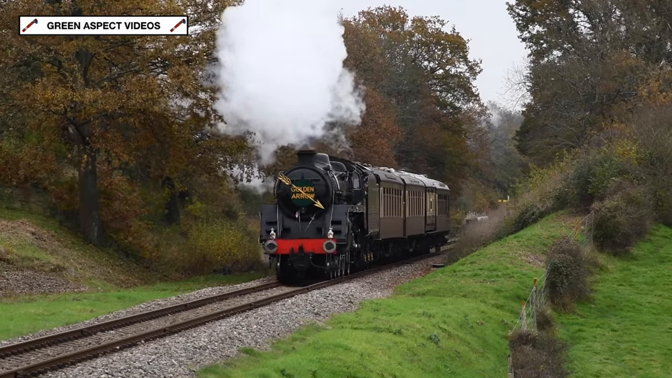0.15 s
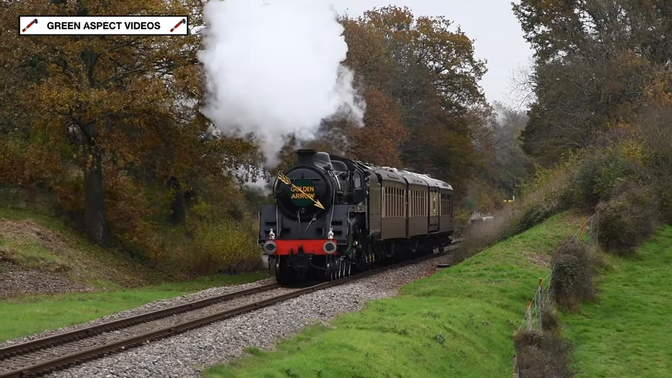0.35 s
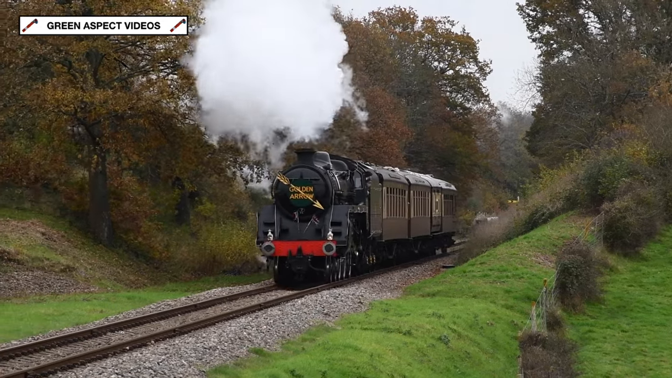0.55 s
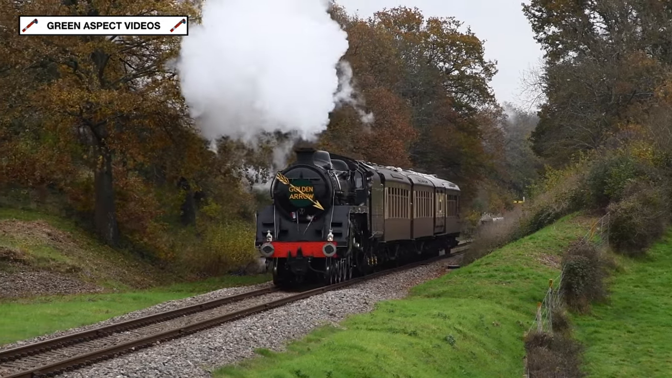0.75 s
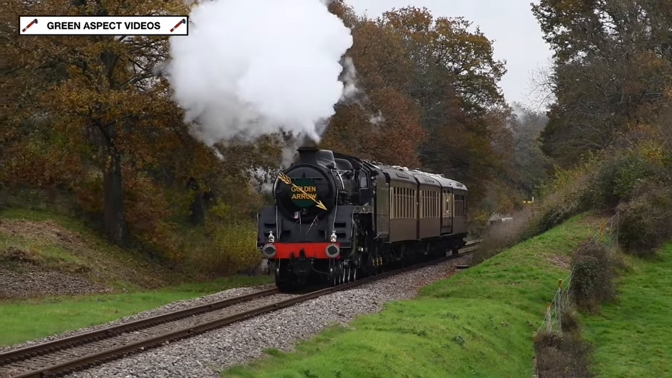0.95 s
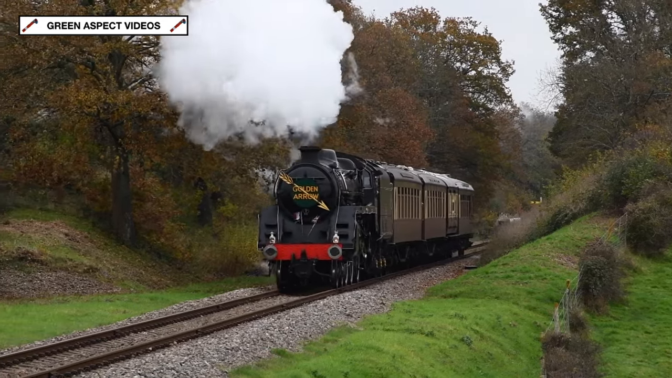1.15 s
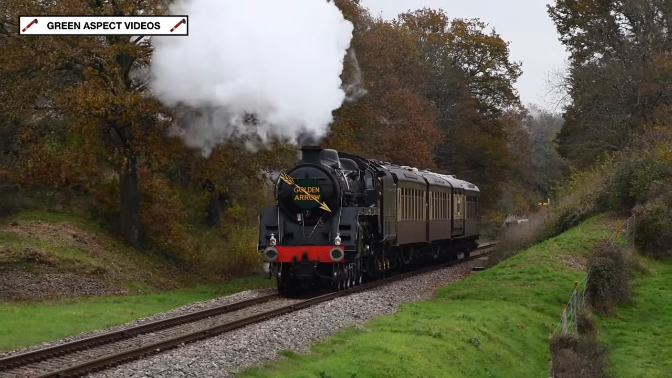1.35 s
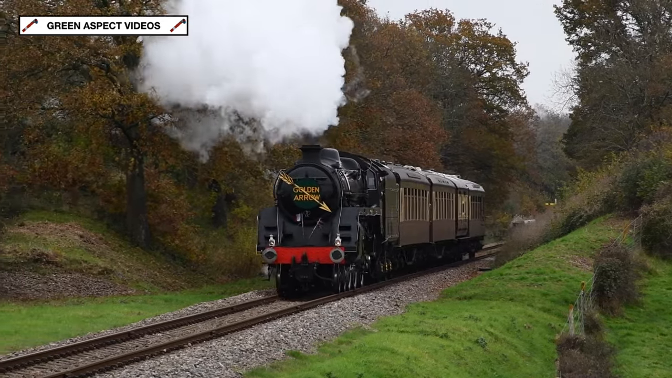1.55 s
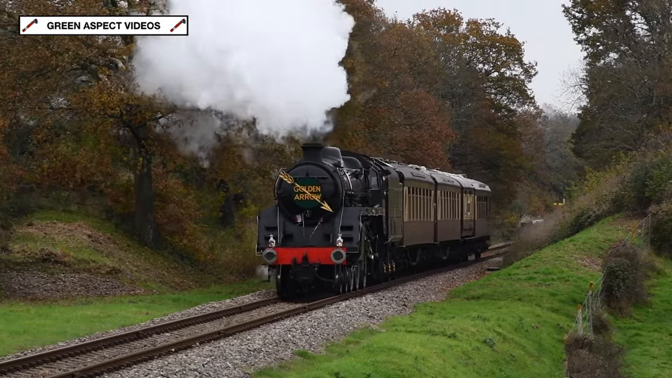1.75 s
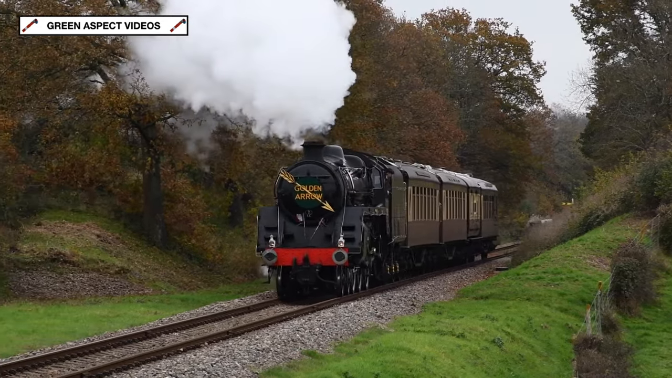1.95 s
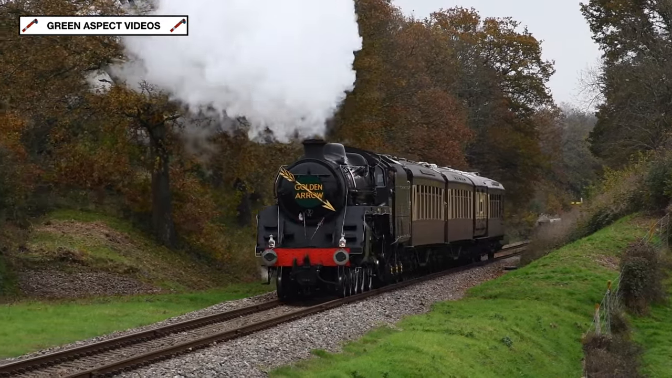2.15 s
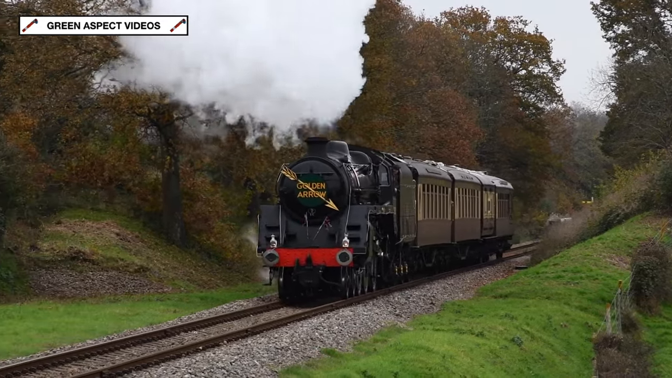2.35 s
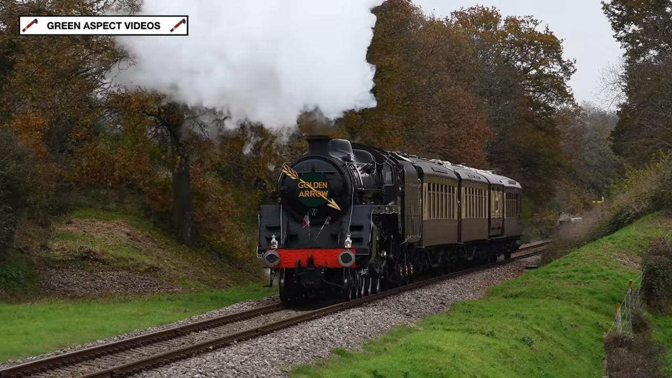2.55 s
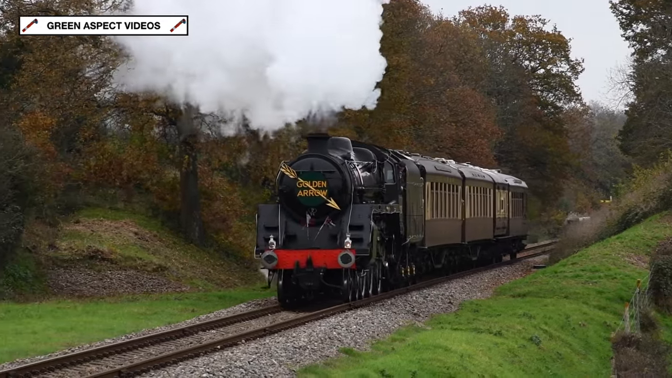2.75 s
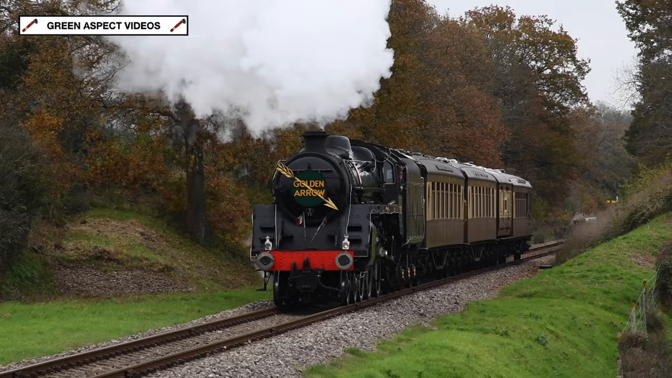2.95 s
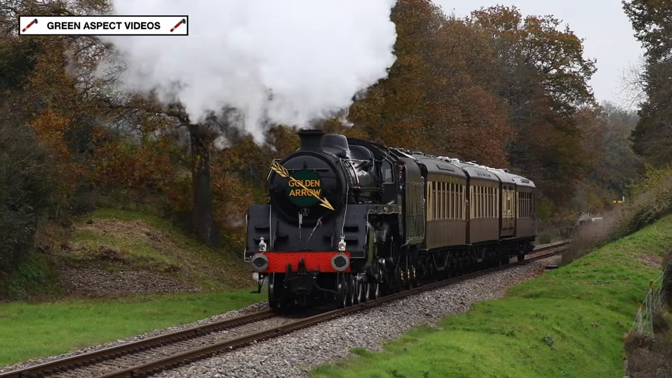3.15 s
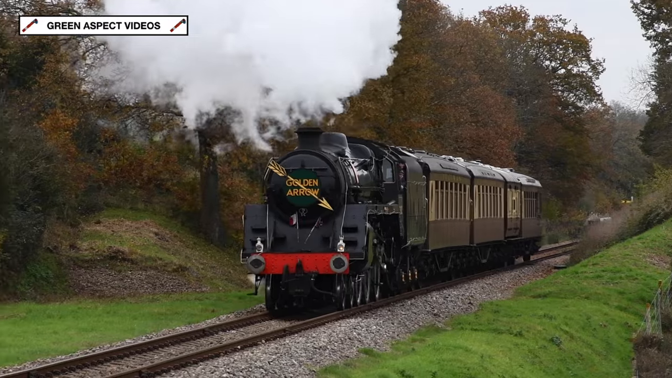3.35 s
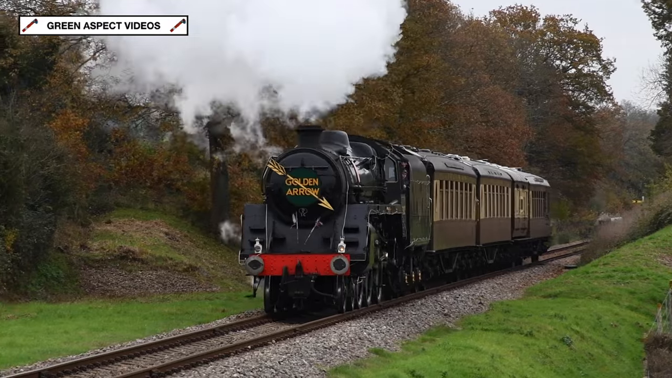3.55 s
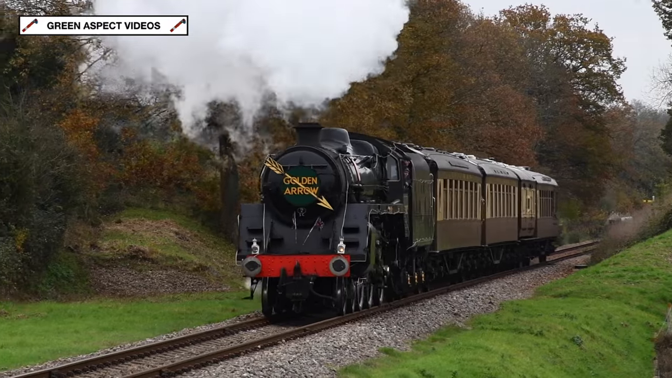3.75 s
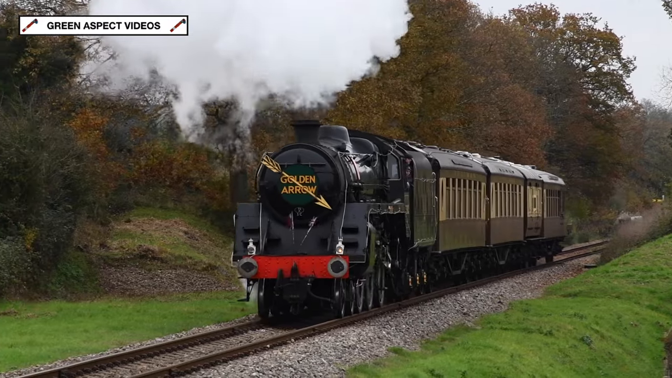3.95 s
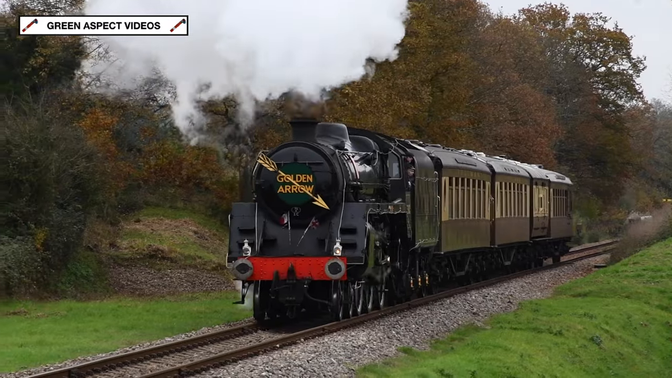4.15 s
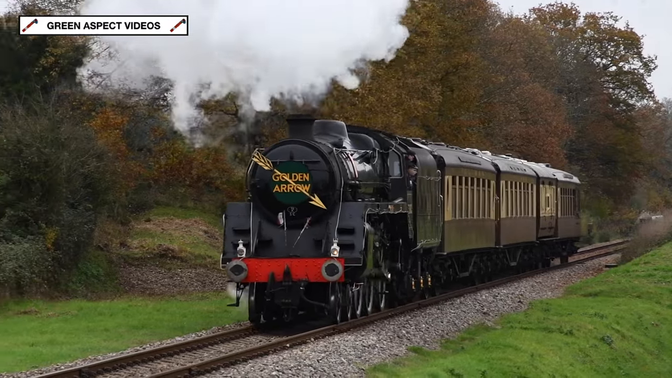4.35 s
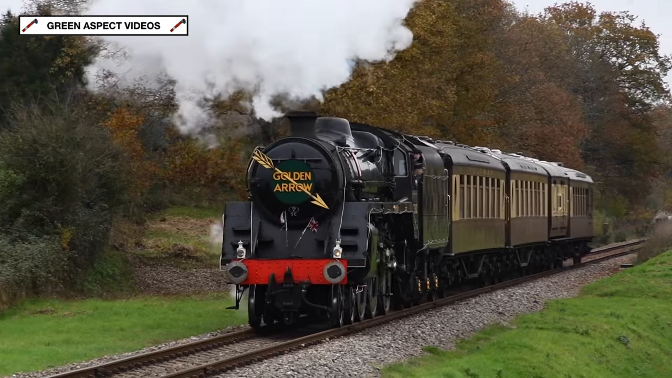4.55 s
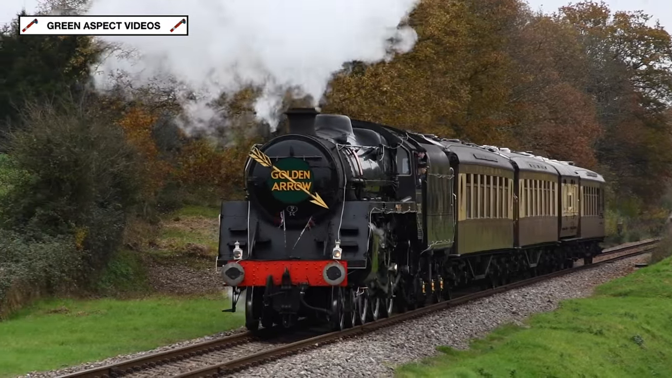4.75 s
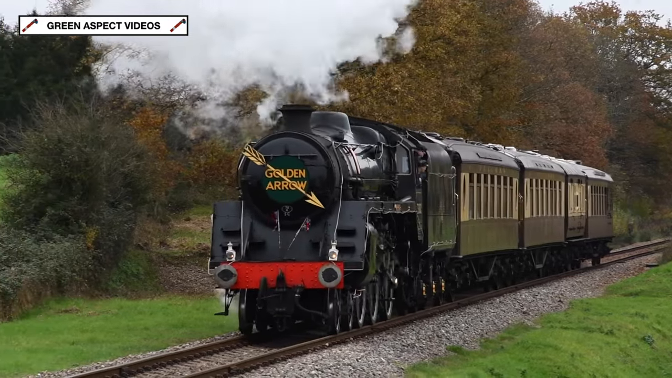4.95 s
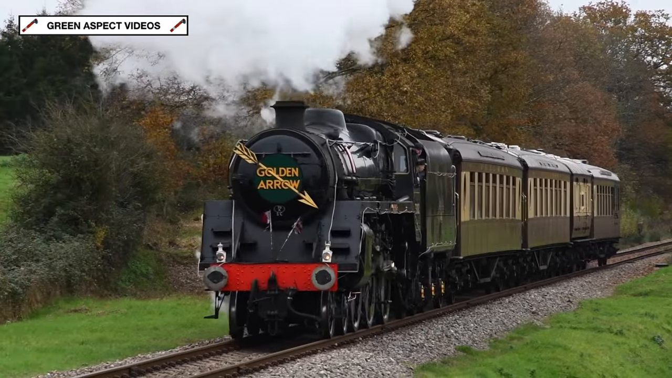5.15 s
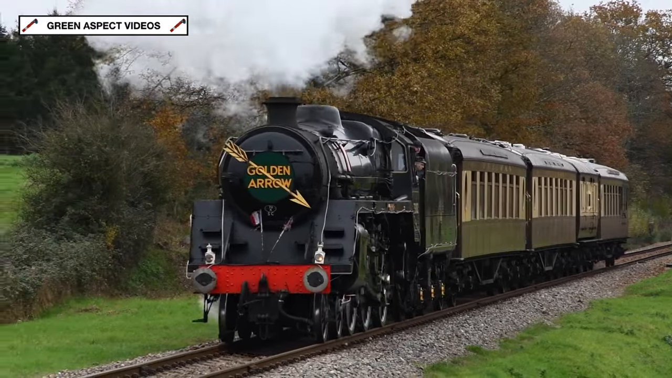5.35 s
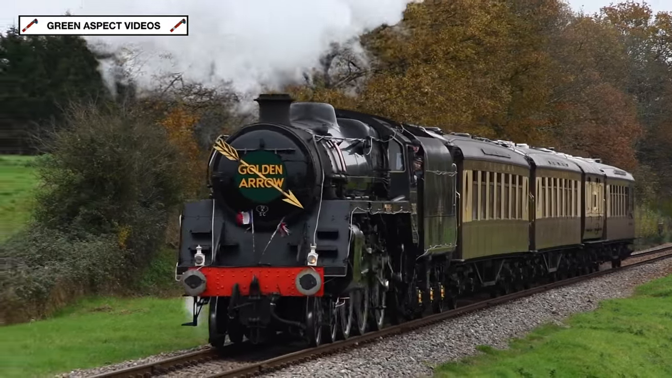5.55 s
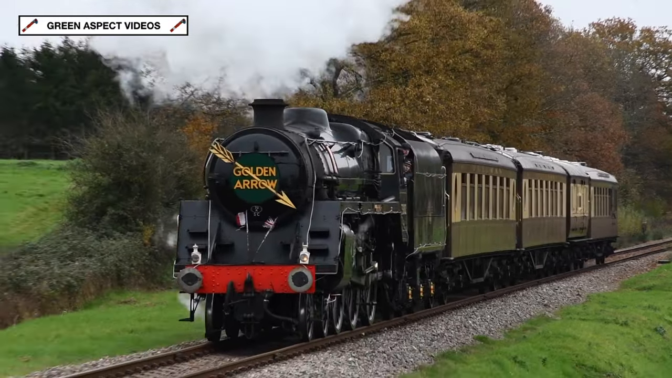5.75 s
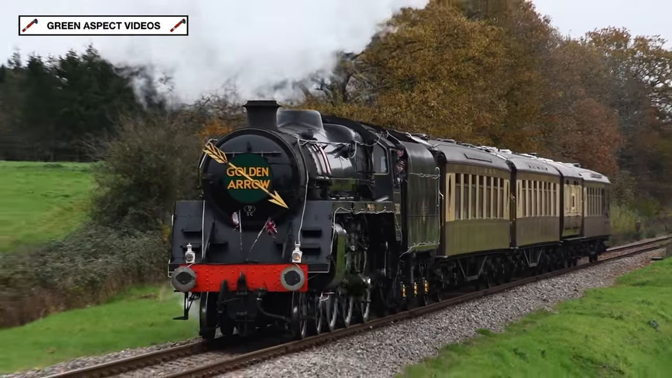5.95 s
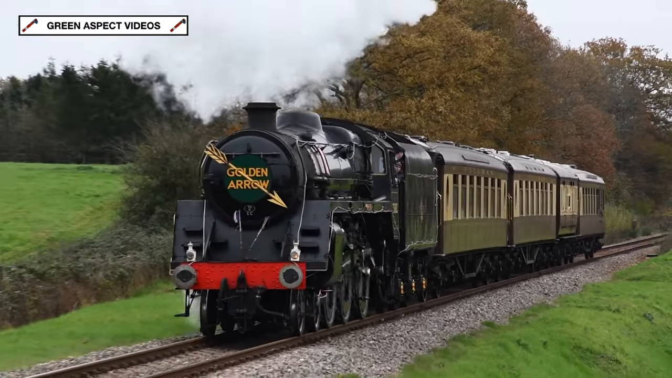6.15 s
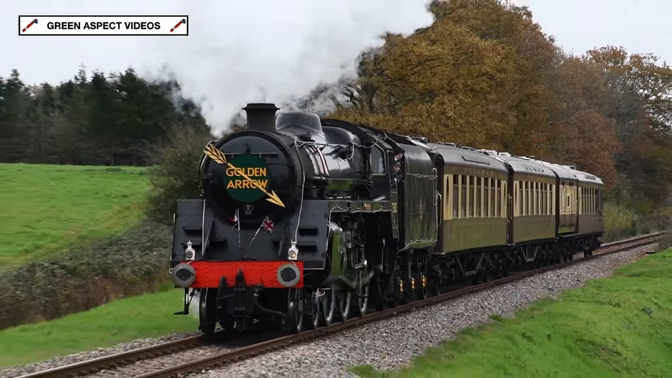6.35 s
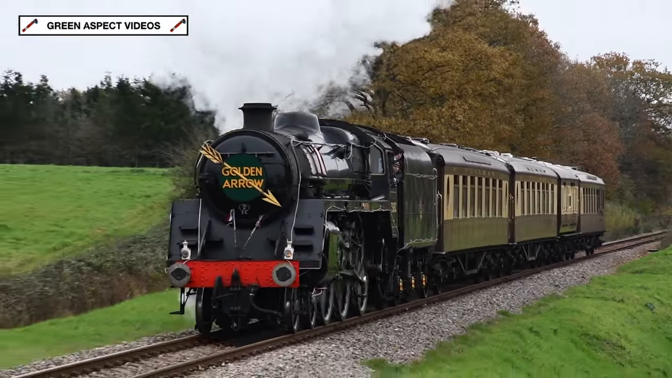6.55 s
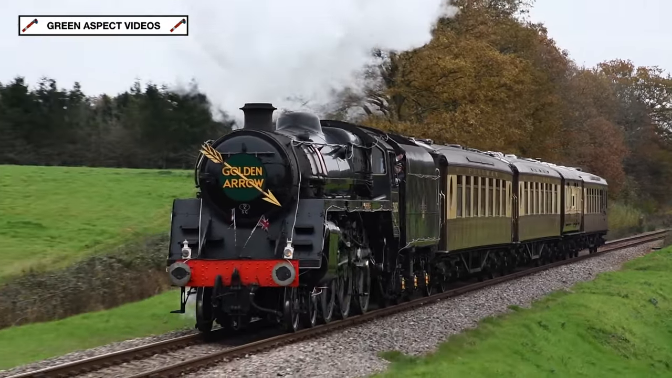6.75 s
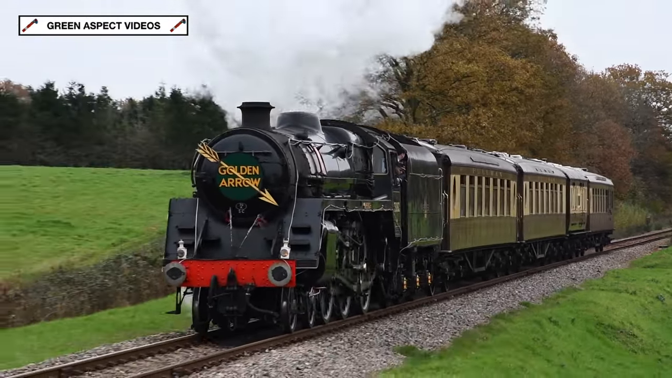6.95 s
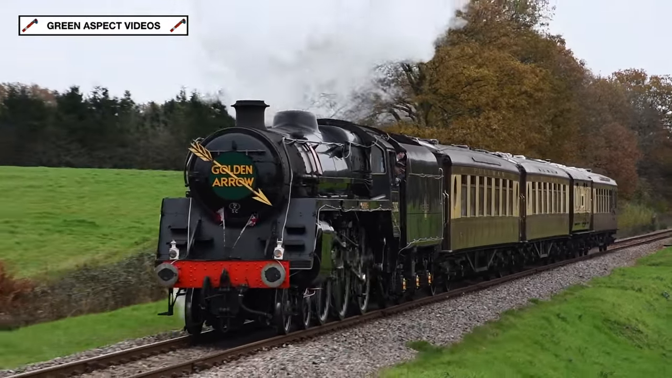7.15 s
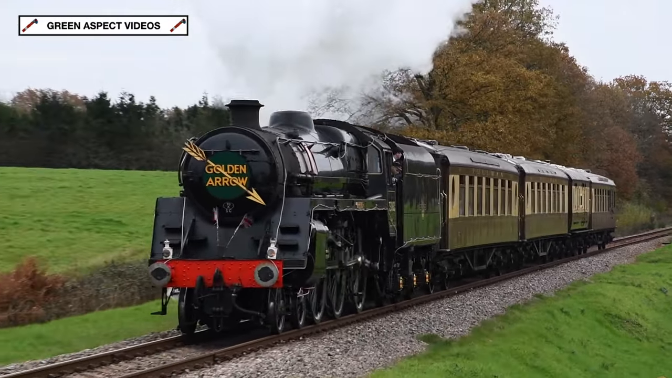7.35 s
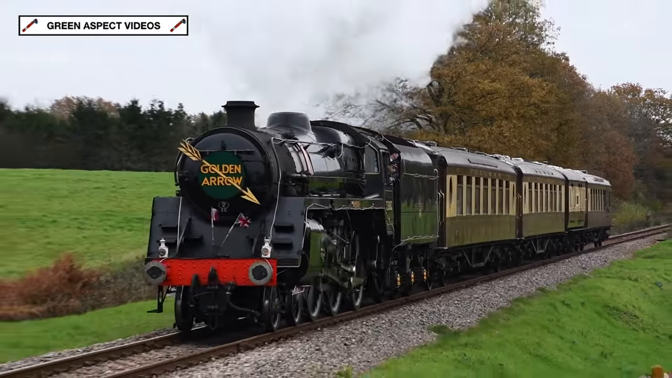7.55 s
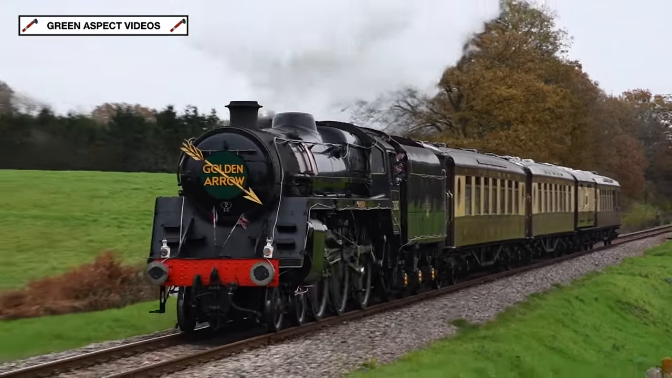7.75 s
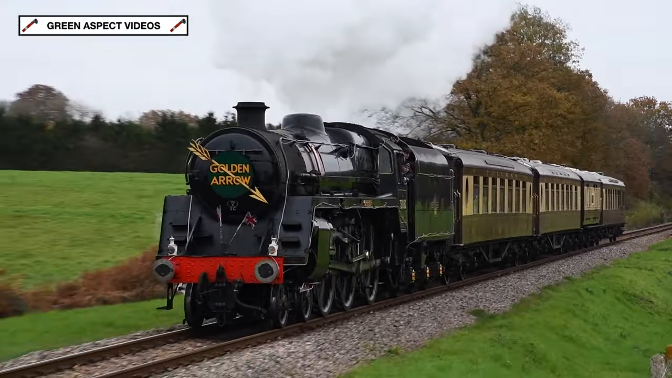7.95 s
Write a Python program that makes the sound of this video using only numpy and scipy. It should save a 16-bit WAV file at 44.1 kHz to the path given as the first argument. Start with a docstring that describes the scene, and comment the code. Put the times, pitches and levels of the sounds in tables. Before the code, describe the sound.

A steam locomotive climbs steadily towards the listener, rapid even chuffs barking from its chimney, growing louder over low wheel rumble and leaking steam hiss.

```python
"""Beside a railway line, with trees and banks around: a two-cylinder steam engine climbs towards the listener.
Four exhaust beats sound in each turn of the wheels. Each is a low thump plus a burst of shaped noise (the jet
of steam), coloured by the chimney and the bounce off the ground; the trees add a dull tail.
The wheels and coaches rumble and leaking steam hisses, both as noise that grows fuller as the train nears.
A thin, wavering tone is the leak singing at its edge."""
import sys
import numpy as np
from scipy import signal
from scipy.fft import rfft, irfft, next_fast_len
from scipy.io import wavfile
from scipy.ndimage import uniform_filter1d

SR = 44100
rng = np.random.default_rng(int(sys.argv[2]) if len(sys.argv) > 2 else 0)


def persist_wave(psi):
    """Save psi, clipped to +-1, as 16-bit WAV."""
    counts = np.round(np.clip(psi, -1, 1) * 32767).astype(np.int16)
    wavfile.write(sys.argv[1], SR, np.atleast_2d(counts).T)


N = 356769
TIME = np.arange(N) / SR  # seconds
SIZE = 16384  # samples in one exhaust beat
BEAT_HZ = np.arange(SIZE // 2 + 1) * SR / SIZE  # the frequencies in its spectrum


def undb(db):
    """Turn decibels into gain."""
    return 10 ** (np.asarray(db) / 20)


def at(s, table):
    """Read a table of time and value at time s, with straight lines between its rows."""
    return np.interp(s, *np.transpose(table))


def on_log(hz, points_hz, values):
    """Draw straight lines between points, with pitch on a logarithmic axis as the ear hears it."""
    return np.interp(np.log(np.maximum(hz, 1)), np.log(points_hz), values)


def causal(db):
    """Build a filter with this gain that rings only after it is struck (minimum phase)."""
    cepstrum = irfft(db * np.log(10) / 20)
    # fold the half before the strike onto the half after it
    cepstrum[1:SIZE // 2] *= 2
    cepstrum[SIZE // 2 + 1:] = 0
    return np.exp(rfft(cepstrum))


def walk(rate, n):
    """Wander smoothly at random, `rate` new values a second, with a spread near 1."""
    hold = max(int(SR / rate), 1)  # samples
    steps = np.repeat(rng.standard_normal(n // hold + 1), hold)
    return np.sqrt(3 / 2) * uniform_filter1d(steps, hold)[:n]


def noise(points_hz, db):
    """Make steady noise with the given spectrum by weighting the frequencies of white noise."""
    n = next_fast_len(N)
    hz = np.arange(n // 2 + 1) * SR / n
    gain = undb(on_log(hz, points_hz, db))
    return irfft(rfft(rng.standard_normal(n)) * gain, n)[:N]


def add(track, start_s, sound):
    """Mix a sound into the track, cutting what runs past its end."""
    i = max(int(start_s * SR), 0)
    track[i:i + len(sound)] += sound[:N - i]


START_M, SPEED_M_S = 113.4, 10.3


def distance(s):
    """Metres from chimney to listener, shrinking at a constant speed."""
    return START_M - SPEED_M_S * s


def nearness(near_m):
    """0 at the start and 1 at near_m; every halving of the distance adds the same."""
    return np.log(START_M / distance(TIME)) / np.log(START_M / near_m)


# one turn of the driving wheels, and the share by which the gradient delays beats for each second gone by
TURN_S, SLOWING_PER_S = .52684, .00057
# the four beats of a turn, uneven as the valves are set:
# (t/s into the turn, level/dB, bass level/dB, treble level/dB, length as a share of the usual)
VALVE_BEATS = [(.0746, -0.67, -1.25, -1.7, 1), (.2106, 0, -1.5, -1.5, 1), (.3344, -0.96, -1.05, -2.8, 1),
               (.4643, -0.85, -2.3, -2.8, .87)]
# beats that bark harder or softer than their valve's usual: (t/s, extra level/dB, extra treble level/dB)
BEAT_ACCENTS = [(.33, -2, 2), (.74, 1, 2.5), (1.26, 0, 1), (1.52, -0.5, 2), (3.63, -0.6, 1.5),
                (3.77, 0.5, -2), (4.16, 0.5, -10), (4.44, 0.3, -0.5), (4.97, 0.5, 2), (5.5, 0.9, 1),
                (6.03, 0.4, 1), (6.27, -1, 1.5), (7.48, -0.5, 2), (7.62, 0, 2.5)]


def strokes(level_db=0.28, bass_db=1.0, treble_db=0.15, stretch=0.041):
    """Time every beat from the turning wheels, in rows like VALVE_BEATS, with small random differences."""
    turns = int(N / SR / TURN_S) + 1
    rows = np.tile(VALVE_BEATS, (turns, 1))
    steady_s = rows[:, 0] + TURN_S * np.repeat(np.arange(turns), len(VALVE_BEATS))
    slowed_s = steady_s * (1 + SLOWING_PER_S * steady_s)
    chance = rng.standard_normal((len(rows), 4)) * [level_db, bass_db, treble_db, stretch]
    rows = np.column_stack([slowed_s, rows[:, 1:] + chance])
    for s, extra_db, extra_treble_db in BEAT_ACCENTS:
        nearest = np.argmin(abs(rows[:, 0] - s))
        rows[nearest] += [0, extra_db, 0, extra_treble_db, 0]
    return rows[rows[:, 0] < N / SR]


# how one beat swells and dies in three registers:
# (t/ms after the valve opens, level/dB at 250 Hz, level/dB at 1.5 kHz, level/dB at 5 kHz)
PUFF_SHAPE = [(-9, -38, -38, -42), (-2.5, -4, -14.5, -7.5), (2.5, -12, -4, 1.5), (6.5, -5.5, -3.5, 2.5),
              (20, 2, 1.5, 1.5), (32.5, 0.5, -3.5, 2), (44, -1.5, -5.5, -6.5), (67.5, -9.5, -16, -12.5),
              (97.5, -18.5, -24.5, -21), (163, -48, -50, -48)]


def jet(ms, front, repeat=0.33, repeat_hz=1000, eddy_db=1.0, eddy_rate=400):
    """Spectrum of one burst: each register swells and dies at its own pace, and eddies shake the turbulence."""
    puff_ms, *shapes = np.transpose(PUFF_SHAPE)
    # the pressure front rings alike from one beat to the next; the finer turbulence is always new
    same = repeat / (1 + (BEAT_HZ / repeat_hz) ** 2)
    eddies = undb(eddy_db * walk(eddy_rate, SIZE))
    turbulence = rfft(rng.standard_normal(SIZE) * eddies)
    flow = irfft(np.sqrt(same) * front + np.sqrt(1 - same) * turbulence)
    burst = 0
    for shape, register in zip(shapes, np.eye(3)):
        swell = undb(np.interp(ms, puff_ms, shape, left=-200, right=-200))
        burst = burst + rfft(flow * swell) * on_log(BEAT_HZ, [250, 1500, 5000], register)
    return burst


def thump(ms, centre_ms=10, width_ms=3, echo_ms=28, echo_db=-10):
    """The slug of steam leaving the chimney: one push-pull-push of pressure, and its echo from the bank."""
    def push_pull_push(x):
        return (x ** 2 - 1) * np.exp(-x ** 2 / 2)

    direct = push_pull_push((ms - centre_ms) / width_ms)
    echo = push_pull_push((ms - centre_ms - echo_ms) / width_ms)
    return direct + undb(echo_db) * echo


def own_colour(hz):
    """Shallow random humps and hollows in dB that make each beat bark a little differently."""
    points_hz, spread_db = np.geomspace(600, 12000, 36), 1.5
    humps_db = spread_db * rng.standard_normal(len(points_hz) - 2)
    return on_log(hz, points_hz, np.pad(humps_db, 1))  # flat at both ends


# pitch of the first dip above zero that the bounce off the ground makes: (t/s, f/Hz)
GROUND_DIP = [(0, 3300), (1, 2740), (2, 2307), (3, 1960), (4, 1770), (5, 1617), (6, 1293), (8.1, 780)]


def ground(hz, s, far_bounce=0.46, near_bounce=0.21, damp_hz=7500):
    """Gain in dB of direct sound plus a late, inverted bounce, which weakens as the chimney nears."""
    dip_hz = at(s, GROUND_DIP)
    bounce = near_bounce + (far_bounce - near_bounce) * distance(s) / START_M
    # the bounce is dull, and comes 1 / dip_hz seconds after the direct sound
    return 20 * np.log10(abs(1 - bounce * np.exp(-(hz / damp_hz) ** 2 - 2j * np.pi * hz / dip_hz)))


# the jet has its plain level at this distance, and its beats grow longer by this share of the usual
BLAST_M, LENGTH_PER_S = 50, 0.029
# basic colour of the jet: (f/Hz, relative level/dB)
BLAST_COLOUR = [(35, -38), (77, -6.5), (138, -8.5), (218, -5), (465, -8.5), (924, -8.5), (1275, -10.5),
                (1916, -13), (2500, -16), (3030, -20), (4170, -22), (5230, -33.7), (7270, -37.5),
                (14600, -60)]
# smokebox and chimney resonances: (f/Hz, width/Hz, lift/dB)
CHIMNEY_RINGS = [(173.2, 30.6, 7.5), (194.4, 35, 3.5), (232.2, 25, 6), (317, 31, 4), (376, 88, 3.5),
                 (408.5, 24, 4.5), (520.5, 26, 3), (554, 105, 2.5), (642, 72, 2.5), (759.5, 18.5, 5.5),
                 (924, 56, 5), (1108, 220, 3), (1366, 73, 4.5), (1680, 255, 4.5), (2437, 280, 3.5)]
# level of the jet, apart from distance: (t/s, level/dB)
JET_LEVEL = [(0, -0.5), (1.5, -1.5), (3, 0.96), (5.3, 0.36), (6.1, -1.15), (7.1, -1), (8.1, -3.5)]
# level of the jet's bass: (t/s, level/dB)
JET_BASS = [(0, 0.2), (2, 0.5), (4.3, .3), (5.3, 2), (6.2, 4.5), (7, 1.3), (8.1, 3.5)]
# level of the jet's treble: (t/s, level/dB)
JET_TREBLE = [(0, 0.5), (1.3, -4), (2.5, -4.5), (4.2, -9), (5.3, -5), (6.3, 3), (8.1, 2)]


def exhaust(jet_db=2.5, thump_db=-29.0, thump_growth_db_per_s=0.95, renew=0.25):
    """Every beat is a jet coloured by chimney and ground, louder with nearness, on top of its thump."""
    lead_s = .03  # room for the sound before the valve time
    ms = (np.arange(SIZE) / SR - lead_s) * 1000
    blast_db = on_log(BEAT_HZ, *np.transpose(BLAST_COLOUR))
    rings_db = sum(db / (1 + ((BEAT_HZ - centre) / (width / 2)) ** 2) for centre, width, db in CHIMNEY_RINGS)
    front = rfft(rng.standard_normal(SIZE))
    out = np.zeros(N)
    for s, db, bass_db, treble_db, length in strokes():
        # the paths to the listener shift a little as the engine moves on
        front = np.sqrt(1 - renew) * front + np.sqrt(renew) * rfft(rng.standard_normal(SIZE))
        shelves_db = [bass_db + at(s, JET_BASS), 0, 0, treble_db + at(s, JET_TREBLE)]
        colour_db = blast_db + on_log(BEAT_HZ, [450, 1000, 3000, 7000], shelves_db)
        colour_db = colour_db + own_colour(BEAT_HZ) + rings_db + ground(BEAT_HZ, s)
        stretched_ms = ms / (length + LENGTH_PER_S * s)
        burst = irfft(jet(stretched_ms, front) * causal(colour_db))
        jet_gain = undb(jet_db + at(s, JET_LEVEL)) * BLAST_M / distance(s)
        thump_gain = undb(thump_db + thump_growth_db_per_s * s)
        add(out, s - lead_s, undb(db) * (jet_gain * burst + thump_gain * thump(ms)))
    return out


def trees(x, t60_s=1.0, buildup_s=0.018, wet_db=-17, damp_hz=1900):
    """Trunks and banks scatter the sound into a dull tail: fading noise that smears every beat."""
    age = TIME[:SR]
    fade = np.exp(-np.log(1000) * age / t60_s)  # down 60 dB after t60_s
    tail = rng.standard_normal(SR) * fade * np.minimum(age / buildup_s, 1) ** 2
    dull = signal.butter(2, damp_hz, fs=SR, output="sos")
    tail = signal.sosfilt(dull, tail / np.linalg.norm(tail))
    return signal.fftconvolve(x, tail)[:N] * undb(wet_db)


def approaching(spectra, near):
    """Noise that gets louder while its far colour gives way to its near colour."""
    hz, far_db, near_db = np.transpose(spectra)
    rise_db = np.median(near_db - far_db)
    share = np.clip(near, 0, 1)
    far = np.sqrt(1 - share) * noise(hz, far_db)
    close = np.sqrt(share) * noise(hz, near_db - rise_db)
    return (far + close) * undb(rise_db * near)


# wheels and coaches: (f/Hz, far level/dB, near level/dB)
WHEEL_COLOUR = [(26, -66, -62), (44, -41, -25), (69.5, -17, -12), (120, -16.5, -5.5), (196, -29, -10),
                (490, -30.5, -19), (980, -25.5, -22.5), (1860, -36.5, -25.5), (5000, -63, -59)]
# level of the wheels' rumble, apart from distance: (t/s, level/dB)
WHEEL_LEVEL = [(0, 0.5), (2.3, -1.5), (3.4, -1.7), (5.5, -2), (6.2, -1.5), (7, -3), (8.1, -2)]


def rolling_wheels(near_m=43.8, jolt_db=2.0):
    """Wheels and coaches rumble as mostly low noise, jolted unevenly in level."""
    level_db = at(TIME, WHEEL_LEVEL) + jolt_db * walk(16, N)
    return approaching(WHEEL_COLOUR, nearness(near_m)) * undb(level_db)


# leaking steam: (f/Hz, far level/dB, near level/dB), before the leak's overall level
LEAK_COLOUR = [(1000, -57, -53), (2530, -45.5, -26), (3300, -40, -28.5), (4000, -46.5, -28.5),
               (4430, -43.5, -30.5), (5670, -55, -40), (5870, -49.5, -36), (7200, -67, -41),
               (10100, -74, -50.5), (15000, -82, -70)]


def steam_leak(near_m=28, level_db=1.0, flutter_db=2.0):
    """Steam escaping through a leak hisses as high noise that flutters in level."""
    return approaching(LEAK_COLOUR, nearness(near_m)) * undb(level_db + flutter_db * walk(29, N))


# how strongly the leak sings: (t/s, level/dB)
SINGING_LEVEL = [(0, -55), (1, -52), (2.4, -45.5), (3.3, -55), (5.5, -52), (6.3, -47), (8.1, -42.5)]


def singing_leak(centre_hz=3540):
    """Steam passing an edge sings: a tone wavering in pitch, made breathy by fast random levels."""
    breath_rate, waver_hz, flutter_db = 520, 70, 2.5  # breath_rate: new values a second
    phase = 2 * np.pi * np.cumsum(centre_hz + waver_hz * walk(25, N)) / SR
    tone = walk(breath_rate, N) * np.cos(phase) + walk(breath_rate, N) * np.sin(phase)
    return tone * undb(at(TIME, SINGING_LEVEL) + flutter_db * walk(22.44, N))


def scene():
    """Add up the exhaust, its tail from the trees, the wheels, the leak and its singing."""
    beats = exhaust()
    return (beats + trees(beats) + rolling_wheels() + steam_leak() + singing_leak())[None]


def record(dry, low_cut_hz=38, hiss_db=-66, top_hz=15750):
    """The microphone sheds deep bass and adds faint hiss; the recorder rounds the peaks and cuts the top."""
    low_cut = signal.butter(4, low_cut_hz, "high", fs=SR, output="sos")
    sound = signal.sosfilt(low_cut, dry)
    hiss = undb(hiss_db) * rng.standard_normal(dry.shape)
    rounded = sound / (1 + (sound / .97) ** 6) ** (1 / 6)  # stays within 0.97
    top_cut = signal.ellip(10, .1, 80, top_hz, fs=SR, output="sos")
    return signal.sosfilt(top_cut, rounded + hiss)


dry = scene()
out = record(dry)
persist_wave(out)
```